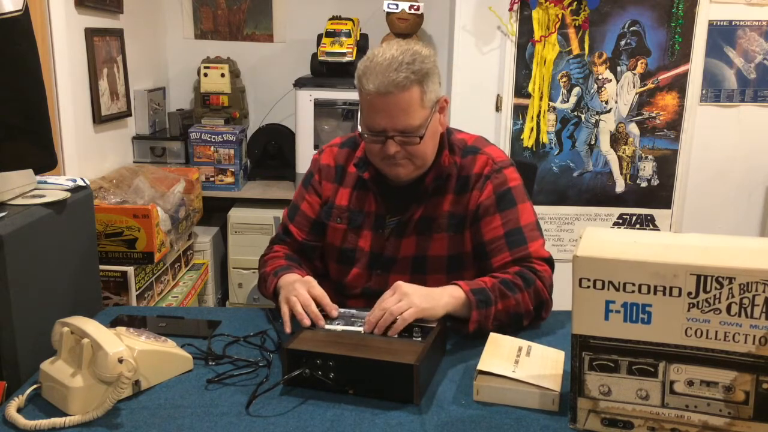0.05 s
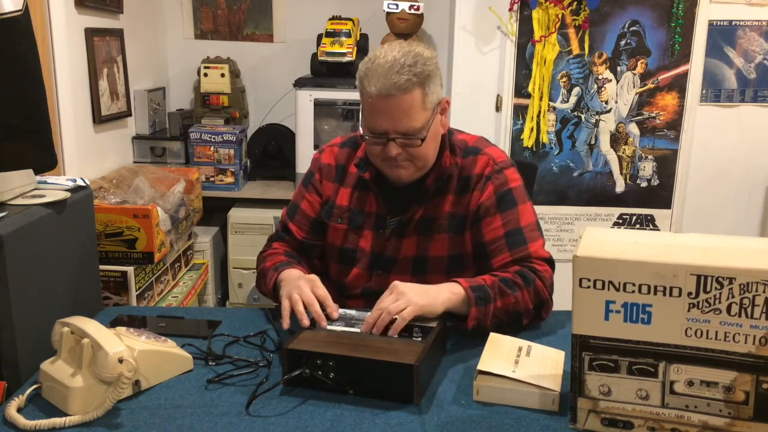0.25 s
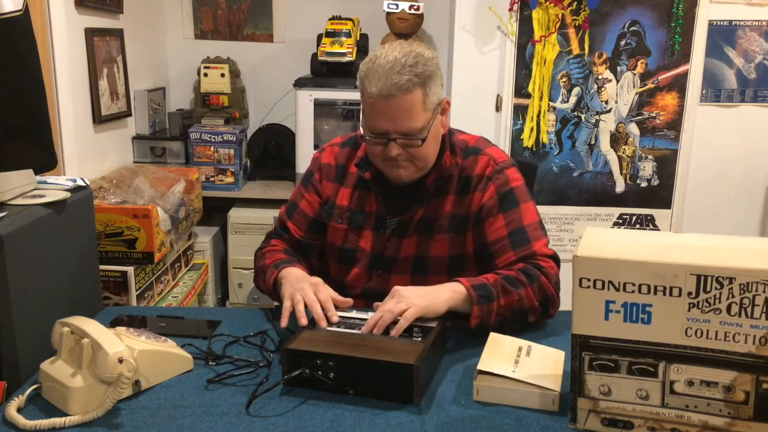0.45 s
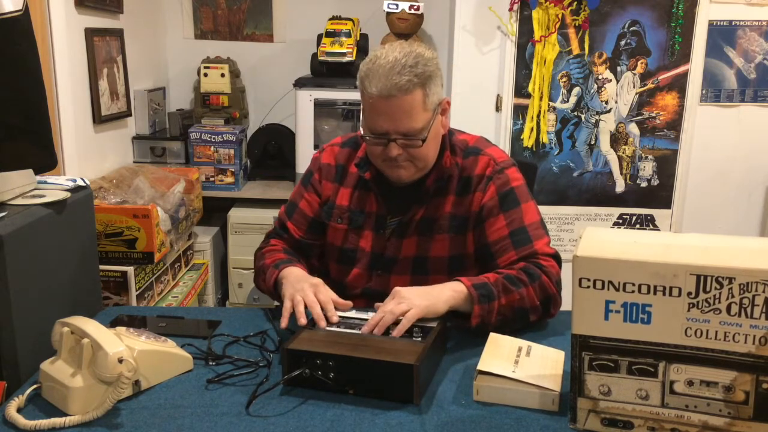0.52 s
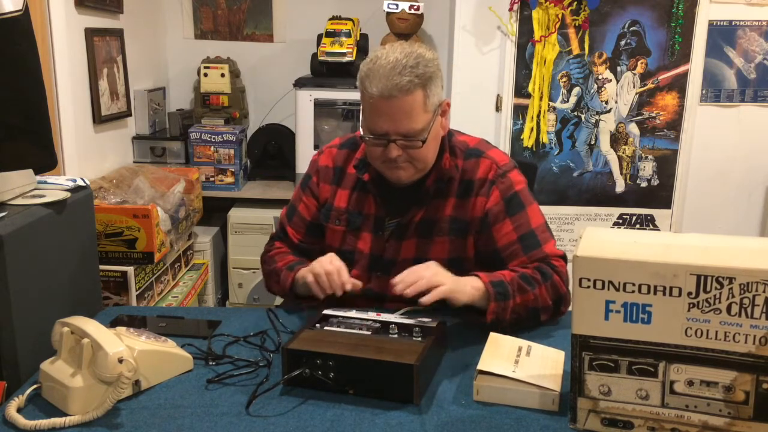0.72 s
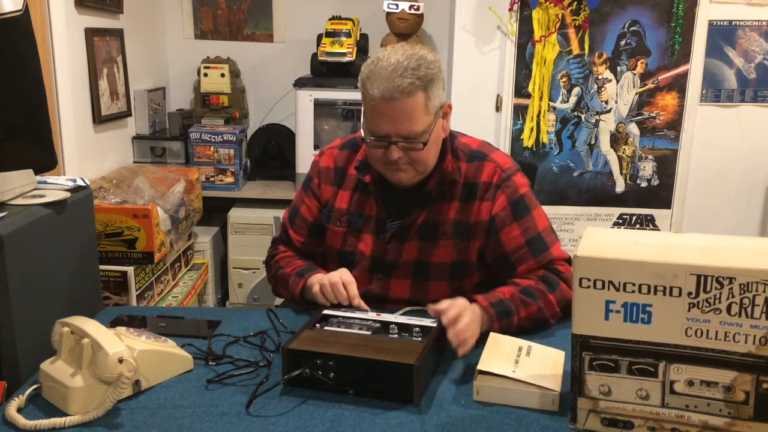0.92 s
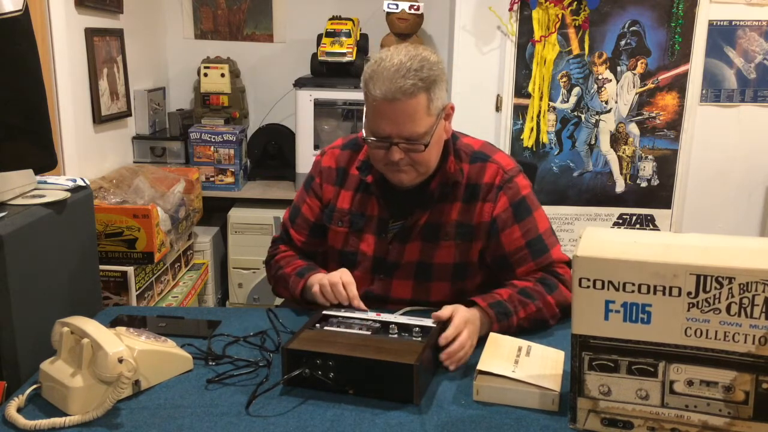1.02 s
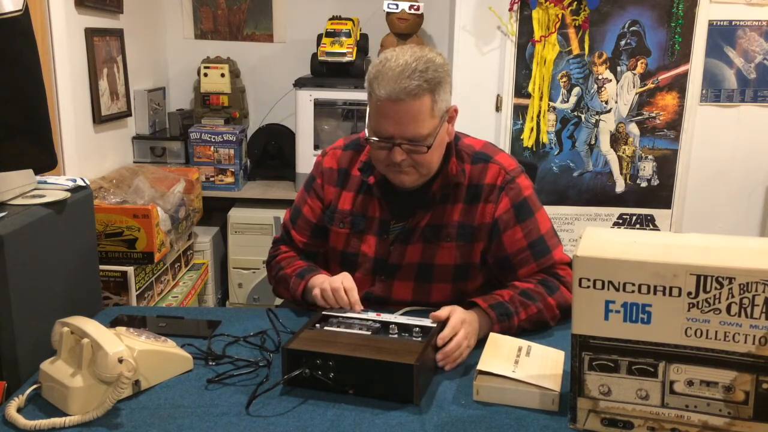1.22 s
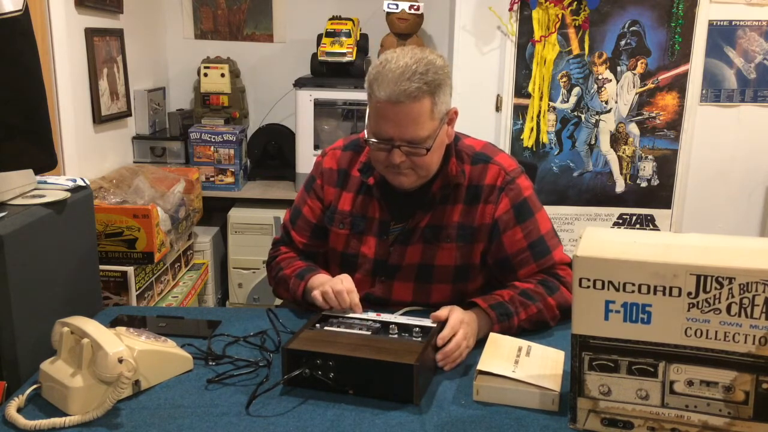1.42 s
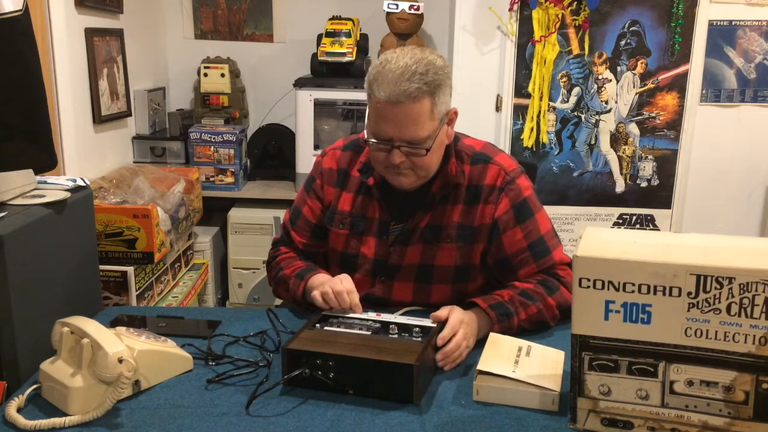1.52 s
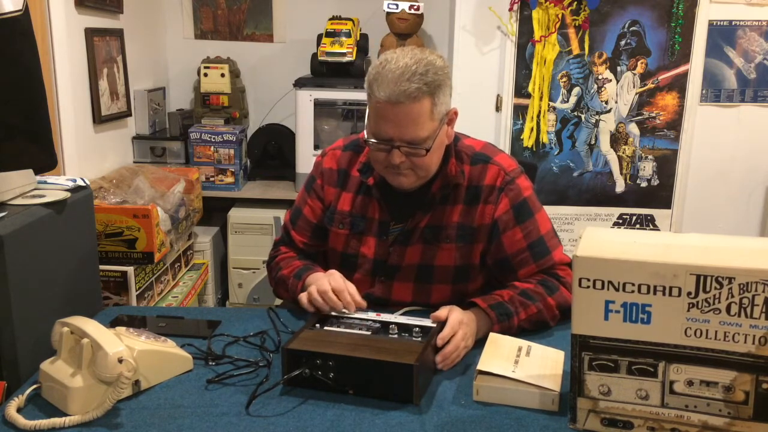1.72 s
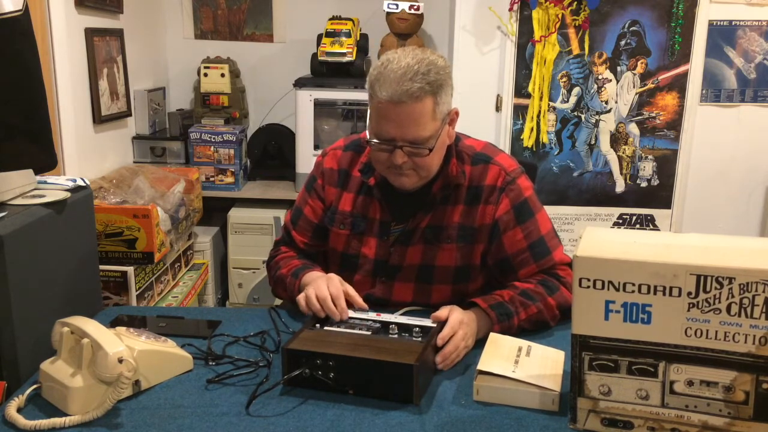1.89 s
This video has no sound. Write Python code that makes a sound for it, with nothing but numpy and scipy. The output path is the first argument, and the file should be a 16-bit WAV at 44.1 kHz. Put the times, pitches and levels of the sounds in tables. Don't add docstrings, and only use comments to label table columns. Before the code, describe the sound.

A plastic cassette clacks into a tape deck in three quick snaps, then faint finger taps

```python
import sys
import numpy as np
from scipy import signal
from scipy.fft import rfft, irfft, next_fast_len
from scipy.io import wavfile
from scipy.ndimage import uniform_filter1d, map_coordinates

SR = 44100
rng = np.random.default_rng(int(sys.argv[2]) if len(sys.argv) > 2 else 0)


def voltage_ratio(level):
    return 10 ** (np.asarray(level, float) / 20)


def dump(signal):
    limited = np.clip(np.atleast_2d(signal).T, -1, 1)
    pcm = np.round(limited * 32767).astype(np.int16)
    wavfile.write(sys.argv[1], SR, pcm)


N = 85995

# f/Hz, level/dB
AIR_COLOUR = [(30, -31), (48, -13), (110, -5), (200, -12), (480, -16.5), (1400, -27), (13000, -34.5),
              (16000, -44.5)]
AIR_DB = -67.5
# f/Hz, level/dB rms, flutter/per s
HUM_TONES = [(59.6, -67, 1.9), (152, -75, 100)]

# t/s, rustle level/dB, body level/dB, body f/Hz, t60/s
FINGER_TOUCHES = [(0, -91, -48, 470, 0.05), (.002, -98, -59, 1450, 0.15), (0.589, -90, -48, 107, 0.11),
                  (1.046, -53, -58, 1800, 0.069), (1.068, -64.5, -62, 582, 0.41),
                  (1.086, -75, -55.5, 295, 0.092), (1.103, -73, -54, 920, 0.049),
                  (1.183, -58.5, -63, 977, 0.07), (1.201, -67, -82, 884, 0.051),
                  (1.318, -69.5, -67.5, 938, 0.2), (1.379, -58.5, -54.5, 350, 0.15),
                  (1.385, -56, -55, 992, 0.05), (1.401, -79, -56, 636, 0.078), (1.455, -67, -72, 1500, .05),
                  (1.58, -83.5, -60.5, 435, 0.061), (1.687, -62, -76, 1502, 0.071),
                  (1.698, -68, -69.5, 910, 0.17), (1.709, -68, -79, 1200, .07),
                  (1.764, -85, -56, 966, 0.084), (1.7975, -99, -58.5, 2830, 0.035),
                  (1.803, -91, -56.5, 1220, 0.058), (1.832, -87, -56, 560, 0.062)]
# f/Hz, level/dB per Hz
RUSTLE_COLOUR = [(710, 1.5), (1200, -0.5), (3620, -1.5), (5530, -1.5), (6100, -6), (10700, -3.5),
                 (16000, -11.5)]
# t/s, level/dB, f/Hz, t60/s
FINGER_TAPS = [(.09, -67.5, 1340, 0.039), (.596, -54, 93, 0.11), (1.048, -60, 5740, 0.069),
               (1.05, -68, 3300, 0.1), (1.104, -59, 560, 0.078), (1.185, -59.5, 5500, 0.042),
               (1.186, -71, 11150, 0.037), (1.384, -59.5, 4497, 0.059), (1.683, -64.5, 1424, 0.03),
               (1.695, -62.5, 7800, 0.13), (1.762, -57.5, 8900, 0.029), (1.770, -41.5, 740, 0.029),
               (1.776, -50.5, 560, 0.1), (1.789, -68, 696, 0.055)]
TOUCH_RISE_S = 0.0029
BODY_WIDTH, TAP_WIDTH = 1.1, 0.35

# t/s, level/dB, f/Hz, t60/s
CLEAN_RINGS = [(0.093, -57.5, 1326, 0.045), (.2148, -25, 689, 0.033), (.2150, -27, 4050, .006),
               (.2270, -22, 1343, .06), (0.2269, -21.5, 4700, .01), (0.2276, -25, 6760, 0.013),
               (.2300, -23.5, 3900, 0.015), (.2360, -35, 390, 0.14), (.4066, -24, 670, 0.11),
               (.4150, -16, 7190, 0.012), (0.415, -22, 3920, 0.012), (.420, -21.5, 560, 0.094),
               (.427, -19, 435, 0.048), (.440, -31, 350, 0.19), (0.4573, -9.5, 4000, 0.0062),
               (0.4579, -11, 7100, 0.0053), (0.4593, -16.5, 6400, 0.006), (.459, -22, 664, 0.072),
               (.464, -27, 6850, .07), (.470, -27, 388.6, 0.13), (1.048, -67, 5670, .06),
               (1.049, -61, 3300, 0.06), (1.186, -65, 5550, 0.055), (1.186, -61, 3300, .05),
               (1.385, -68, 4700, .06), (1.771, -47, 720, 0.044), (1.776, -55, 560, 0.077),
               (1.799, -68, 3000, .03)]

# t/s, crack level/dB, knock level/dB, chatter t60/s
GUIDE_CONTACTS = [(.203, -62.5, -61, 0.03), (.2146, -27.5, -14.5, 0.0027), (.2162, -26.5, -28, 0.027),
                  (.2180, -32, -31.5, 0.0068), (.2258, -17, -35, .02), (.2275, -22.5, -25, .012),
                  (.2305, -21, -21.5, 0.0057), (.2345, -32, -23, 0.019), (.2445, -37.5, -34.5, 0.0067),
                  (.262, -45, -40.5, 0.0074), (.312, -43.5, -46.5, 0.073)]
# t/s, crack level/dB, knock level/dB, chatter t60/s
SPINDLE_CONTACTS = [
    (.385, -58, -72.5, 0.027),
    (.396, -50.5, -67, 0.031),
    (.4064, -17.5, -23, 0.028),
    (.4148, -15.5, -22.5, 0.011),
    (.4158, -17.5, -20.5, 0.031),
    (.4190, -24.5, -17, 0.0045),
    (.4245, -32, -15.5, 0.003),
    (.432, -41.5, -28.5, 0.038),
]
# t/s, crack level/dB, knock level/dB, chatter t60/s
CATCH_CONTACTS = [
    (.4546, -21, -41.5, 0.015),
    (.4577, -8.5, -23.5, 0.005),
    (.4588, -15, -21, 0.021),
    (.4612, -19, -28, 0.0083),
    (.4655, -28.5, -24, 0.023),
    (.515, -40.5, -26, 0.081),
    (.59, -59, -50, 0.042),
]
# f/Hz, level/dB, t60/s
SHELL_MODES = [(60, -30, .05), (118, -19.5, 0.056), (193, -11.5, 0.072), (370, -9.5, 0.034),
               (528, -7.5, 0.06), (688, -2, 0.034), (968.7, -3, 0.072), (1144, -4.5, 0.023),
               (1380, 6, 0.022), (1614, 2, 0.026), (2110, -1.5, 0.012), (3590, -5.5, 0.03),
               (4420, -5.5, 0.012), (6533, -15.5, .008)]
# f/Hz, level/dB, t60/s
WELL_MODES = [(80.05, -20.5, 0.13), (122, -20, 0.11), (193.2, -13, 0.15), (350, -12, 0.016),
              (435, -1.5, 0.062), (560, 1, .02), (627, 2.5, 0.027), (904, -7, 0.072), (1500, -0.5, 0.02),
              (2000, -11.5, 0.022), (2564, -6.5, 0.027), (3300, -11.5, 0.021), (4044, -3, 0.0078),
              (7100, -12, 0.01)]
# f/Hz, level/dB, t60/s
CASE_MODES = [(56.17, -35, .05), (93, -10, 0.17), (114, -7.5, 0.057), (162, -10, 0.039), (192, -7, 0.12),
              (350, -6, 0.074), (410, -3.5, .07), (533, -5, 0.035), (670, 0, 0.026), (1060, -6, 0.02),
              (1541, -6.5, 0.014), (2650, -3.5, 0.012), (4130, -7, .01), (6850, -13.5, 0.02)]
# f/Hz, level/dB
CRACK_COLOUR = [(300, -32.5), (1000, -5), (2400, -7), (4100, -7.5), (5800, -7.5), (7100, -5.5), (8500, -10),
                (16000, -14.5)]
SNAP_DB, SNAP_S = 1, 0.0012
SOFTEN = 45
BLOW = 1.8
MODE_SPLIT = 0.44

# f/Hz, level/dB, t60/s
SPRING_TONES = [(403, -61.5, 1.1), (498, -60, 2.31)]
SPRING_S = 0.43

# f/Hz, t60/s
ROOM_DECAY = [(100, 0.23), (400, 0.13), (1500, 0.22), (3500, 0.2), (7500, 0.17), (11000, 0.15),
              (15000, 0.12)]
# f/Hz, level/dB
ROOM_COLOUR = [(150, -6), (500, -2), (1500, -1.5)]
ROOM_DB, WALL_S = -5.5, 0.003
TOP_HZ = 16100


def along(points, hz):
    f, v = np.transpose(points)
    return np.interp(np.log(hz + 1), np.log(f + 1), v)


def unit(x):
    return x / np.sqrt(np.mean(x ** 2) + 1e-20)


def filtered(x, response):
    m = next_fast_len(len(x) + SR)
    hz = np.fft.rfftfreq(m, 1 / SR)
    return irfft(rfft(x, m) * response(hz), m)[:len(x)]


def noise(colour, size=N):
    white = rng.standard_normal(size)
    return unit(filtered(white, lambda hz: voltage_ratio(along(colour, hz))))


def wobble(rate):
    return map_coordinates(rng.standard_normal(200), [np.arange(N) * rate / SR])


def burst(s, t60, rise_s, size=N):
    t = np.maximum(np.arange(size) / SR - s, 0)
    return (1 - np.exp(-t / rise_s)) * voltage_ratio(-60 * t / t60)


def room(x):
    hz, t, z = signal.stft(rng.standard_normal(SR // 2), SR, nperseg=256)
    decay_db = -60 * t / along(ROOM_DECAY, hz)[:, None]
    colour_db = along(ROOM_COLOUR, hz)[:, None]
    tail = signal.istft(z * voltage_ratio(decay_db + colour_db), SR, nperseg=256)[1]
    tail = tail / np.linalg.norm(tail)
    delayed = np.pad(x, (round(WALL_S * SR), 0))
    return x + voltage_ratio(ROOM_DB) * signal.fftconvolve(delayed, tail)[:len(x)]


def floor():
    t = np.arange(N) / SR
    hum = np.zeros(N)
    for hz, db, rate in HUM_TONES:
        level = voltage_ratio(db + 3.5 + 1.4 * wobble(rate))
        hum += level * np.sin(2 * np.pi * hz * t + wobble(2 * rate) / 2)
    return voltage_ratio(AIR_DB + 1.4 * wobble(7.7)) * noise(AIR_COLOUR) + hum


def knocks(rows, width):
    out = np.zeros(N)
    pushes = rng.standard_normal((len(rows), SR // 4))
    for (s, db, hz, t60), push in zip(rows, pushes):
        w = width * hz
        shape = burst(0, t60, TOUCH_RISE_S, size=len(push))
        body = shape * filtered(push, lambda f: (1j * f * w / (hz * hz - f * f + 1j * f * w)) ** 2)
        body *= voltage_ratio(db) * np.linalg.norm(shape) / np.linalg.norm(body)
        part = out[round(s * SR):][:len(push)]
        part += body[:len(part)]
    return out


def touches():
    rubbing = sum(voltage_ratio(db) * burst(s, t60, TOUCH_RISE_S) for s, db, _, _, t60 in FINGER_TOUCHES)
    rustle = noise(RUSTLE_COLOUR) * rubbing
    thuds = [(s, *body) for s, _, *body in FINGER_TOUCHES]
    return rustle + knocks(thuds, BODY_WIDTH) + knocks(FINGER_TAPS, TAP_WIDTH)


def clean_rings():
    t = np.arange(N) / SR
    out = np.zeros(N)
    for s, db, hz, t60 in CLEAN_RINGS:
        out -= voltage_ratio(db) * burst(s, t60, 0.6 / hz) * np.sin(2 * np.pi * hz * (t - s))
    return out


def ring(modes):
    t = np.arange(SR // 8) / SR
    split = MODE_SPLIT * rng.standard_normal((len(modes), 3, 1))
    h = np.zeros(len(t))
    for k, (hz, db, t60) in enumerate(modes):
        partials = np.sin(2 * np.pi * (hz + split[k] * np.sqrt(hz)) * t).sum(axis=0)
        h += (-1) ** k * voltage_ratio(db - 60 * t / t60) * partials
    return h / np.linalg.norm(h)


def snaps(contacts, modes):
    out, size = np.zeros(N), SR // 8
    for s, crack_db, knock_db, t60 in contacts:
        rise = 0.0001 + SOFTEN * t60 ** 3
        roughness_db = 5.6 * uniform_filter1d(rng.standard_normal(size), size=12)
        grit = noise(CRACK_COLOUR, size=size) * voltage_ratio(roughness_db)
        shape = burst(0, t60, rise, size=size)
        edge = voltage_ratio(SNAP_DB) * np.gradient(burst(0, SNAP_S, rise / 2, size=size))
        crack = unit(grit * shape) * np.sqrt(np.mean(shape ** 2)) - edge

        push = burst(0, 0.43 * t60, rise, size=size)
        force = push * rng.standard_normal(size)
        force[0] = BLOW * np.linalg.norm(force) * np.exp(-rise / 0.0041)
        knock = signal.fftconvolve(force, ring(modes))[:size]
        knock *= np.linalg.norm(push) / np.linalg.norm(knock)

        hit = voltage_ratio(crack_db) * crack + voltage_ratio(knock_db + 11.5) * knock
        hit = room(np.pad(hit, (0, SR // 2)))
        out[round(s * SR):][:len(hit)] += hit
    return out


def spring():
    t = np.arange(N) / SR
    out = np.zeros(N)
    for hz, db, t60 in SPRING_TONES:
        out += voltage_ratio(db + 1.4 * wobble(3.9)) * burst(SPRING_S, t60, 0.0063) * np.sin(2 * np.pi * hz * t)
    return out


def scene():
    seating = snaps(GUIDE_CONTACTS, SHELL_MODES)
    pushing = snaps(SPINDLE_CONTACTS, WELL_MODES)
    locking = snaps(CATCH_CONTACTS, CASE_MODES)
    return (floor() + room(touches()) + clean_rings() + seating + pushing + locking + spring())[None]


def band_limit(x):
    return signal.sosfilt(signal.butter(12, 16820, fs=SR, output="sos"), x)


def record(dry):
    mix = filtered(dry[0], lambda hz: 1 / (1 + (hz / TOP_HZ) ** 80))[None]
    return band_limit(mix)


dry = scene()
out = record(dry)
dump(out)
```